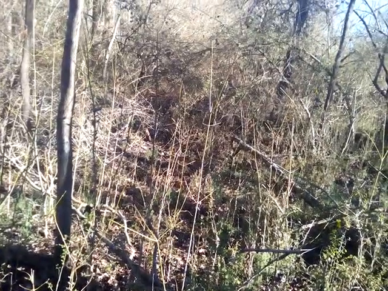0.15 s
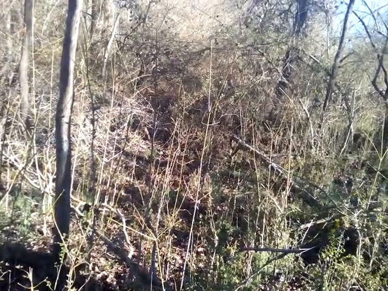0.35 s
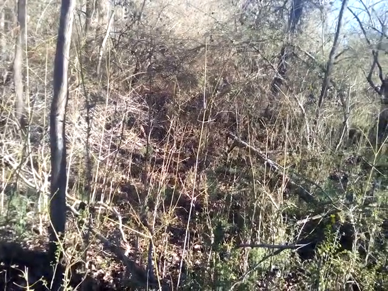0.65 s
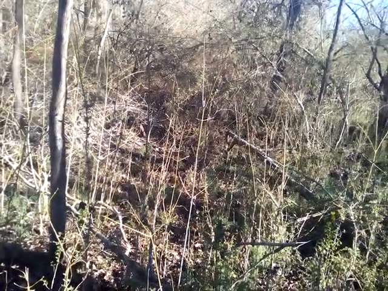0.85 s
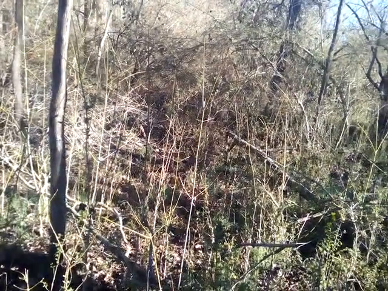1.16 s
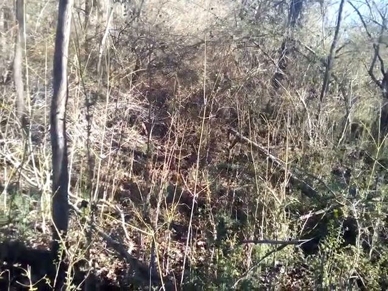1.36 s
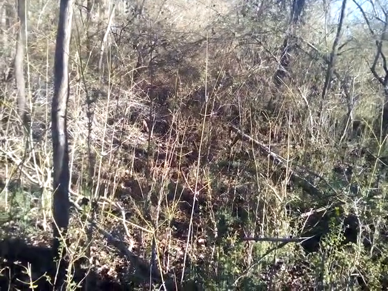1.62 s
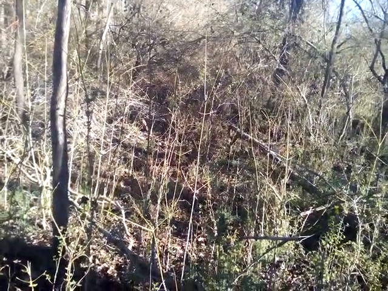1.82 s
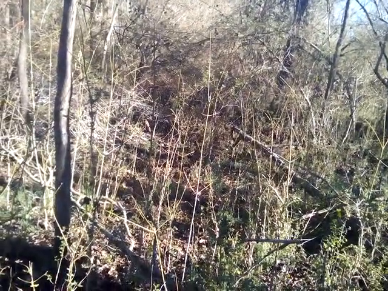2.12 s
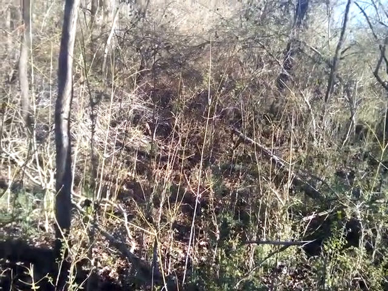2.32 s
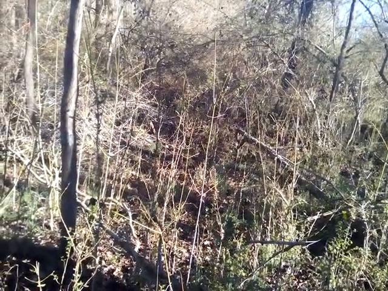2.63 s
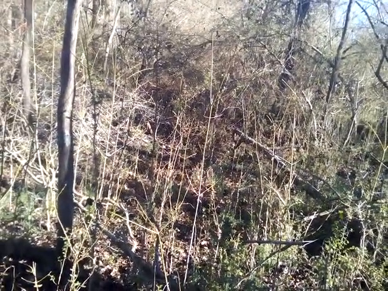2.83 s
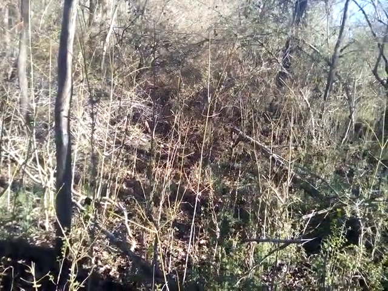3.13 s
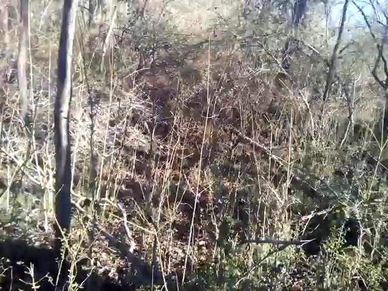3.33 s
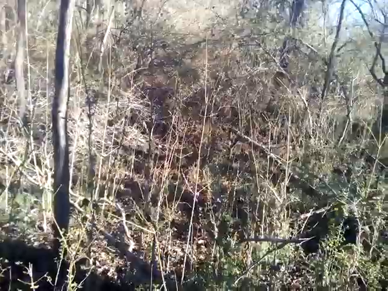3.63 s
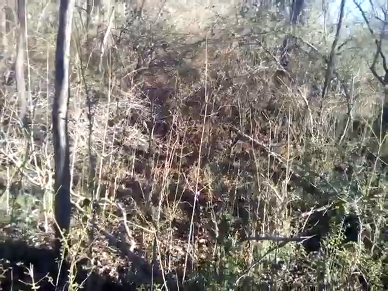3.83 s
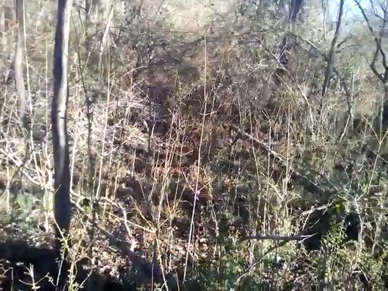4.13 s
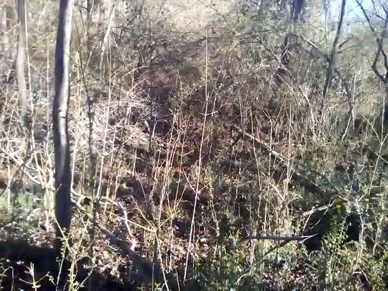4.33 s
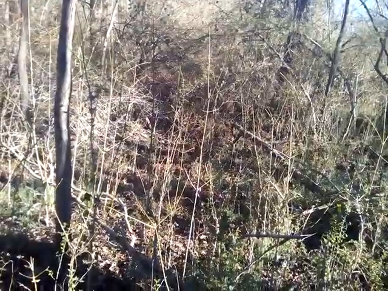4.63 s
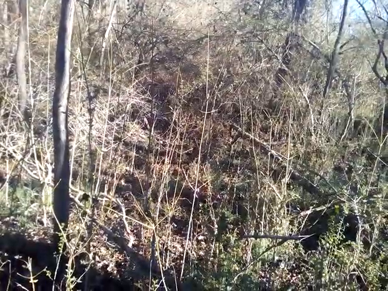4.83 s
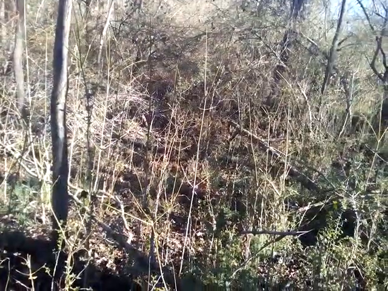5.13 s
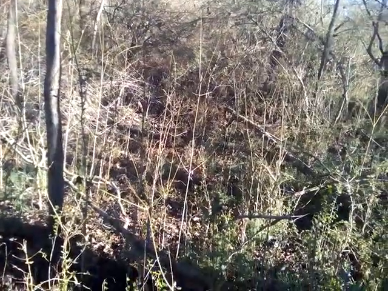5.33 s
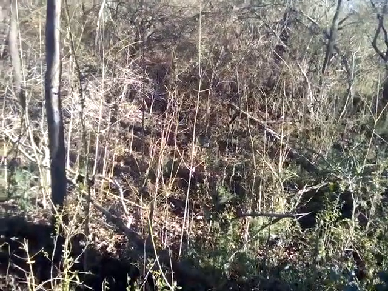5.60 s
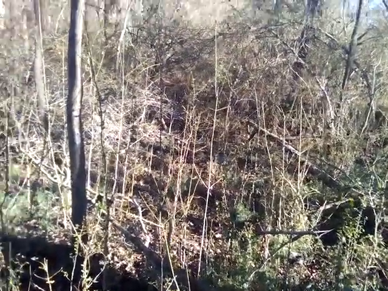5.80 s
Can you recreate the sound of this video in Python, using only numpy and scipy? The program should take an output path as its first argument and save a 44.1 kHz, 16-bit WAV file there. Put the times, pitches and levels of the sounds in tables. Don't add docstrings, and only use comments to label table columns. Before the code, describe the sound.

A quiet winter wood, captured by a small handheld microphone with soft hiss and a low, wavering far-road drone. The fading echo of an earlier hound bay hangs at the start as a high bird call falls sharply at 0 s. Wind thumps the microphone around 0.5-0.6 s while a husky whistle rises. At about 1.2 s one far hound yelps for a fifth of a second, breaking upward then dropping, and echoes through the trunks; thin bird twitter overlaps. At 1.4 s a twig snaps loudly close by, with a crackling splinter tail and stray ticks. From 2 to 3.5 s a bird repeats a tumbling phrase among whistles and chips; wind thumps at 2.75 s, with tiny leaf ticks near 3 s. Around 4-5 s it is sparser, with soft wind and small calls. Leaves swell from 5.2 s; a strap clicks at 5.64 s, then dry leaves crunch at 5.75 s.

```python
import sys
import numpy as np
from scipy import signal
from scipy.fft import rfft, irfft
from scipy.io import wavfile
from scipy.ndimage import uniform_filter1d

SR = 44100
rng = np.random.default_rng(int(sys.argv[2]) if len(sys.argv) > 2 else 0)


def pcm_store(signal):
    levels = np.round(np.clip(np.atleast_2d(signal), -1, 1) * 32767)
    wavfile.write(sys.argv[1], SR, levels.astype(np.int16).T)


def gain_from_db(level_db):
    decades = np.asarray(level_db, float) / 20
    return 10 ** decades


N = 262836
LEAD = int(1.0 * SR)


def level(x, db):
    return x * gain_from_db(db) / np.sqrt(np.mean(x ** 2))


def colour(x, points):
    hz, db = np.transpose(points)
    f = np.arange(len(x) // 2 + 1) * SR / len(x) + 1
    gain = gain_from_db(np.interp(np.log(f), np.log(hz), db)) * (f < hz[-1])
    return irfft(rfft(x) * gain, len(x))


def ring(x, hz, width):
    return signal.lfilter(*signal.iirpeak(hz, hz / width, SR), x)


def ring_twice(x, hz, width):
    return ring(ring(x, hz, width), hz, width)


def curve(rows):
    t = np.arange(N) / SR
    power = 0
    for s, rise, hold, fall, db in rows:
        fade_db = 20 * np.maximum(t - s - rise - hold, 0) / fall
        power = power + (np.clip((t - s) / rise, 0, 1) * gain_from_db(db - fade_db)) ** 2
    return np.sqrt(power)


def walk(rate, size=N):
    k = max(int(SR / rate), 1)
    steps = np.repeat(rng.standard_normal(size // k + 1), k)
    return 1.235 * uniform_filter1d(uniform_filter1d(steps, k), k)[:size]


def add(out, s, x):
    i = LEAD + int(s * SR)
    out[i:i + len(x)] += x[:len(out) - i]


# f/Hz, level/dB
THROAT = [(600, 2.5), (950, -1), (1220, 1), (1310, -7.5), (1450, -20.5), (1880, -22.5), (2500, -28),
          (2900, -20.5), (3300, -29), (3800, -23), (4500, -33), (5800, -29), (8000, -57)]


def hound_breath(notes):
    mouth_db, mouth_width_hz = 20.5, 220
    jitter, rasp_db = 0.0075, -11
    u = [np.linspace(0, 1, int(n[0] * SR)) for n in notes]
    hz = np.concatenate([a + (b - a) * v for (_, a, b, _, _), v in zip(notes, u)])
    mouth_hz = uniform_filter1d(np.concatenate([n[3] + 0 * v for n, v in zip(notes, u)]), 350)
    arches = [gain_from_db(n[4]) * np.clip(np.sin(np.pi * v), 0, 1) ** .35 for n, v in zip(notes, u)]
    gain = uniform_filter1d(np.concatenate(arches), 150)
    hz = uniform_filter1d(hz, 60) * (1 + jitter * walk(180, size=len(hz)))
    phase = 2 * np.pi * np.cumsum(hz) / SR
    out = 0
    for k in range(1, 11):
        mouth = mouth_db / (1 + ((k * hz - mouth_hz) / mouth_width_hz) ** 2)
        db = np.interp(k * hz, *np.transpose(THROAT)) + mouth
        rasp = 1 + gain_from_db(rasp_db) * (k * hz / 2600) ** 2 * walk(700, size=len(hz))
        out = out + gain_from_db(db) * rasp * np.sin(k * phase)
    swell = np.clip(np.arange(len(hz)) / SR / 0.013, 0, 1)
    return np.sqrt(2) * gain * swell * out


# length/s, start f/Hz, end f/Hz, mouth resonance f/Hz, level/dB
YELP = [
    (.018, 920, 968, 2910, -37.5),
    (.032, 1185, 1230, 2550, -40),
    (.020, 753.5, 738, 1490, -50.5),
    (.019, 731.4, 704.3, 1900, -38.5),
    (.043, 683.5, 664.3, 2020, -41),
    (.07, 659, 650, 1970, -41.5),
]
EARLIER_BAY = [
    (.25, 790, 652, 1960, -35),
]


def hound():
    out = np.zeros(LEAD + N)
    add(out, 1.231, hound_breath(YELP))
    add(out, -.9, hound_breath(EARLIER_BAY))
    return out


def whistle(length, hz0, hz1, settle, db, swell=.45, wobble=.006, flutter_db=2.5, knee=1, late=1.03):
    t = np.arange(int(length * SR)) / SR
    glide = hz1 + (hz0 - hz1) * np.exp(-(t / settle) ** knee)
    hz = glide * (1 + wobble * walk(300, size=len(t)))
    arch = np.clip(np.sin(np.pi * (t / length) ** late), 0, 1) ** swell
    shape = arch * gain_from_db(db + flutter_db * walk(89.3, size=len(t)))
    return np.sqrt(2) * shape * np.sin(2 * np.pi * np.cumsum(hz) / SR)


# t/s, length/s, start f/Hz, end f/Hz, level/dB
RISERS = [
    (-.25, .33, 3000, 4350, -72),
    (.572, .275, 2300, 4170, -57.5),
    (2.335, .2, 2800, 4330, -59),
    (2.99, .18, 2950, 4330, -60),
    (3.655, .21, 2400, 3960, -61),
    (3.915, .08, 3400, 4250, -64),
    (5.74, .15, 3400, 4150, -69),
]
# offset f/Hz, level/dB
SIDE_TONES = [
    (420, -8.5),
    (-430, -10),
]


def rising_whistles(out):
    settle_s, knee = .072, 1.5
    for s, length, a, b, db in RISERS:
        add(out, s, whistle(length, a, b, settle_s, db, swell=.7, wobble=.009, flutter_db=3.5,
                            knee=knee, late=1.3))
        for off, side_db in SIDE_TONES:
            add(out, s, whistle(length, a + off, b + off, settle_s, db + side_db, swell=.8, wobble=.018,
                                flutter_db=4, knee=knee))


# delay t/s, length/s, start f/Hz, end f/Hz, level/dB
PHRASE = [
    (-.062, .02, 3650, 3770, -1),
    (-.044, .038, 3700, 2730, -4),
    (-.006, .03, 2150, 2140, -2),
    (.014, .034, 2100, 2630, .5),
    (.065, .03, 2300, 3350, -5),
    (.102, .045, 3000, 1600, -2.5),
]
# t/s, level/dB
PHRASE_STARTS = [
    (.045, -68),
    (.27, -70),
    (2.045, -68),
    (2.325, -62),
    (2.598, -62),
    (2.862, -61.5),
    (3.135, -62),
    (3.422, -61.5),
]


def repeated_phrase(out):
    for s, db in PHRASE_STARTS:
        for lag, length, a, b, rel_db in PHRASE:
            add(out, s + lag, whistle(length, a, b, .42 * length, db + rel_db, swell=.7, wobble=.015,
                                      flutter_db=1.2))


# t/s, length/s, start f/Hz, end f/Hz, level/dB
SWOOPS = [
    (.011, .12, 9060, 7326, -54),
    (.06, .11, 8300, 7880, -64),
    (1.157, .1, 10670, 8050, -65.5),
    (2.408, .1, 8900, 7280, -63),
    (2.771, .08, 6600, 7300, -69),
    (3.175, .068, 1660, 1886, -65.5),
    (4.861, .052, 6400, 7620, -65),
    (4.88, .053, 6700, 7240, -68),
    (5.43, .065, 4130, 4300, -64.5),
]
# t/s, length/s, start f/Hz, end f/Hz, level/dB
SLIDES = [
    (2.65, .007, 6900, 5700, -59),
    (2.684, .022, 7080, 5900, -62),
    (4.821, .034, 7200, 5900, -65),
    (5.35, .076, 3320, 4080, -64),
    (5.513, .085, 3270, 4130, -58.5),
]
# t/s, length/s, f/Hz, level/dB
CHIPS = [
    (.916, .02, 5600, -62.5),
    (2.05, .012, 5660, -60.5),
    (3.236, .012, 5750, -62),
    (4.585, .04, 4600, -70),
    (5.305, .012, 5800, -65),
]
# t/s, length/s, f/Hz, level/dB
HELD = [
    (-.07, .096, 4950, -64),
    (2.445, .13, 4920, -60),
    (2.47, .064, 5400, -74),
    (5.62, .099, 4130, -70),
]


def thin_calls(out):
    for s, length, a, b, db in SWOOPS:
        add(out, s, whistle(length, a, b, .2 * length, db))
    for s, length, a, b, db in SLIDES:
        add(out, s, whistle(length, a, a + (b - a) / (1 - np.exp(-1)), length, db))
    for s, length, hz, db in CHIPS:
        add(out, s, whistle(length, hz, hz * (1 - .06), .008, db, wobble=.014))
    for s, length, hz, db in HELD:
        add(out, s, whistle(length, hz, hz, length, db, wobble=.003))


# t/s, length/s, f/Hz, level/dB
BUZZES = [
    (.05, .1, 6700, -73),
    (.84, .08, 6900, -76),
    (1.574, .085, 6900, -71),
    (2.395, .075, 6800, -71),
    (2.775, .06, 6700, -73),
    (4.53, .11, 6780, -68),
]


def buzzy_calls(out):
    spacing_hz, side_db, sag = 430, -3, .025
    for s, length, hz, db in BUZZES:
        for k in (-1, 0, 1):
            a = hz + k * spacing_hz
            add(out, s, whistle(length, a, a * (1 - sag), length, db + abs(k) * side_db, wobble=.012,
                                flutter_db=4))


# t/s, flick length/s, low f/Hz, high f/Hz, level/dB
TWITTER = (1.224, .016, 8400, 10100, -62)


def twitter(out):
    s, flick, low, high, db = TWITTER
    for k in range(5):
        start, end = (low, high) if k % 2 == 0 else (high, low)
        add(out, s + k * flick, whistle(flick, start, end, flick / 2, db - k * 1.5))


def birds():
    out = np.zeros(LEAD + N)
    for sing in (rising_whistles, thin_calls, buzzy_calls, twitter, repeated_phrase):
        sing(out)
    return out


# band centre f/Hz, t60/s, level/dB
WOOD = [(463, 2.3, 5.5), (1070, 1.63, 4), (1930, 1.48, 1.5), (4000, 0.79, 2.5), (8240, 0.69, 2)]


def wood(direct, x):
    t = np.arange(int(2.2 * SR)) / SR
    trunks = rng.standard_normal(len(t)) * gain_from_db(2.5 * walk(400, size=len(t))) * np.clip(t / .006, 0, 1)
    slope = 1 + 0.71 * np.exp(-((t - .27) / .05) ** 2)
    echo = 0
    for hz, t60, db in WOOD:
        edges = [hz / np.sqrt(2), hz * np.sqrt(2)]
        band = signal.sosfilt(signal.butter(2, edges, "band", fs=SR, output="sos"), trunks)
        band = band * (10 ** (-3 * t / t60) * slope + 0.77 * np.exp(-t / 0.034))
        echo = echo + gain_from_db(db) * band / np.sqrt(np.sum(band ** 2) * SR / hz / np.sqrt(2))
    return (direct + signal.fftconvolve(x, echo)[:len(x)])[LEAD:]


# f/Hz, level/dB
MIC_TOP = [(100, 9.5), (7300, 2.5), (8600, -6), (11000, -2), (16000, -13)]


def mic_treble(x):
    return colour(x, MIC_TOP)


def snap(s, db, modes):
    click = np.zeros(N)
    click[int(s * SR)] = 1
    x = sum((-1) ** k * gain_from_db(g) / w * ring_twice(click, f, w) for k, (f, w, g) in enumerate(modes))
    return x * gain_from_db(db) / np.abs(x).max()


# t/s, level/dB
TWIG = (1.4150, -6.5)
# f/Hz, width f/Hz, level/dB
TWIG_MODES = [(6300, 1380, 2.5), (4300, 1800, -5.5), (2400, 530, -24), (10500, 2500, -51),
              (15400, 970, -21), (300, 300, -36)]
# level/dB, t60/s
SPLINTERS = [
    (-23, .033),
    (-52, .45),
]


def twig():
    noise = rng.standard_normal(N) * gain_from_db(3.9 * walk(700))
    rough = level(sum(gain_from_db(g) * ring_twice(noise, f, 2.1 * w) for f, w, g in TWIG_MODES[:4]), 0)
    age = np.maximum(np.arange(N) / SR - TWIG[0], 0)
    rise = np.clip(age / .002, 0, 1) ** 2
    tail = rise * sum(gain_from_db(db - 60 * age / t60) for db, t60 in SPLINTERS)
    return snap(*TWIG, TWIG_MODES) + mic_treble(tail * rough)


# t/s, level/dB
STRAP = (5.642, -15.5)
CRUNCH_CLICK = (5.7395, -37)
# f/Hz, width f/Hz, level/dB
STRAP_MODES = [(1540, 1270, 0.5), (3140, 790, -1.5), (4380, 900, -1), (6400, 860, 1.5), (9500, 2900, -37),
               (600, 600, -14)]


def strap():
    return snap(*STRAP, STRAP_MODES) + snap(*CRUNCH_CLICK, STRAP_MODES)


# t/s, rise/s, hold/s, fall/s per 20 dB, level/dB
RUSTLES = [
    (2.95, .05, .6, .05, -66),
    (5.28, .15, .25, .4, -58.5),
    (5.737, .001, .022, .03, -46.5),
    (5.772, .01, .02, .1, -52),
]
# t/s, level/dB
TICKS = [(1.3324, -41), (1.725, -50), (1.7659, -42), (1.8138, -52), (1.9435, -34), (2.9916, -46),
         (3.02, -42), (3.062, -45), (3.103, -46), (3.1794, -43), (3.2924, -53), (3.5244, -51),
         (5.6211, -25), (5.7389, -44), (5.7773, -21.5), (5.7894, -35), (5.8092, -49), (5.8092, -41),
         (5.8511, -45), (5.8731, -51)]
# f/Hz, level/dB
LEAVES = [(200, -6), (500, 3.5), (1500, -4.5), (3500, -7.5), (5000, -7.5), (6600, -2.5), (8000, -21.5),
          (12000, -33.5), (16000, -53)]


def leaves():
    grains = rng.standard_normal(N) * gain_from_db(2.5 * rng.exponential(size=N) + 1.5 * walk(150))
    rustle = curve(RUSTLES) * level(colour(grains, LEAVES), 0)
    t = np.arange(400) / SR
    ticks = np.zeros(LEAD + N)
    for s, db in TICKS:
        add(ticks, s, gain_from_db(db - 11.5) * rng.standard_normal(len(t)) * np.exp(-t / 0.0026))
    return rustle + colour(ticks[LEAD:], LEAVES)


# peak t/s, level/dB, half width/s
GUSTS = [(.56, -45, .06), (.84, -51, .02), (1.04, -50, .02), (1.19, -48, .035), (1.42, -52, .12),
         (2.2, -55, .15), (2.66, -50, .04), (2.75, -39, .035), (3.12, -54, .08), (3.43, -52, .07),
         (4.48, -47, .08), (5.18, -54, .1), (5.47, -51, .1), (5.81, -51, .05)]
# trough t/s, level/dB, width/s
PUFFS = [
    (.521, -32.5, .0040),
    (.545, -47, .005),
    (0.606, -28.5, 0.0036),
    (2.705, -39.5, .005),
    (2.747, -28, 0.0038),
    (2.816, -39, 0.0046),
    (4.461, -40.5, 0.0038),
    (4.529, -40, 0.0047),
    (5.796, -39.5, 0.001),
]


def wind():
    t = np.arange(N) / SR
    rumble_band = signal.butter(3, [48, 135], "band", fs=SR, output="sos")
    low = signal.sosfilt(rumble_band, rng.standard_normal(N))
    breeze_db = -61
    gust = gain_from_db(breeze_db) + sum(gain_from_db(db) * np.exp(-((t - s) / width) ** 2) for s, db, width in GUSTS)
    out = gust * level(low * gain_from_db(2.1 * walk(14)), -3)
    for s, db, width in PUFFS:
        u = (t - s) / width
        out = out - gain_from_db(db) * np.cos(2.26 * u) * np.exp(-u ** 2 / 2.15)
    return out


# t/s, rise/s, hold/s, fall/s per 20 dB, level/dB
CHORUS = [
    (-.2, .1, .85, .3, -66),
    (1.4, .2, .1, .3, -74),
    (2.1, .4, 1.4, .5, -66),
    (5.0, .5, .4, 1.2, -66),
]


def far_chorus():
    chorus = sum(ring_twice(rng.standard_normal(N), hz, 600) * gain_from_db(1.9 * walk(9))
                 for hz in (2300, 2685, 3430, 4100))
    return curve(CHORUS) * level(chorus, 0)


# f/Hz, level/dB per Hz
ROAD = [(12, -46), (20, -4), (43, -12.5), (64, -11), (83, 3.5), (102, -11), (145, 2), (173, -20),
        (203, -15), (400, -19.5), (520, -44), (880, -120)]
# f/Hz, width f/Hz, level/dB
DRONE = [
    (75.2, 9.8, -59),
    (142.6, 9.4, -66.5),
]
# nearest t/s, level/dB
CARS = [
    (.6, 7),
    (2.1, 4),
    (3.6, 3),
    (6.0, 2),
]


def far_road():
    rumble = level(colour(rng.standard_normal(N), ROAD), -53.5 - 8.0)
    drone = sum(level(ring(rng.standard_normal(N), f, w), db) * gain_from_db(.8 * walk(1.436)) for f, w, db in DRONE)
    t = np.arange(N) / SR
    pass_s = .3
    passing = np.sqrt(sum(gain_from_db(db) ** 2 / (1 + ((t - s) / pass_s) ** 2) for s, db in CARS))
    tyres = passing * level(ring_twice(rng.standard_normal(N), 820, 900), -67)
    return rumble + drone + tyres


# f/Hz, level/dB per Hz
AIR = [(88, -39), (150, -3), (197, -10), (314, -14), (541, -13.5), (670, -8), (988, -5.5), (2230, -23),
       (2820, -19.5), (4500, -26), (6510, -23.5), (8880, -41.5), (13400, -39), (14700, -30.5), (15600, -27)]


def air():
    return level(colour(rng.standard_normal(N), AIR), -58) * gain_from_db(0.35 * walk(3.0))


def scene():
    dog, song = hound(), mic_treble(birds())
    far = wood(dog + gain_from_db(-2) * song, dog + song)
    near = twig() + strap() + leaves() + wind()
    return (far + near + far_chorus() + far_road() + air())[None]


def low_pass(x):
    return signal.sosfilt(signal.butter(12, 17010, fs=SR, output="sos"), x)


def record(dry):
    return low_pass(dry)


dry = scene()
out = record(dry)
pcm_store(out)
```